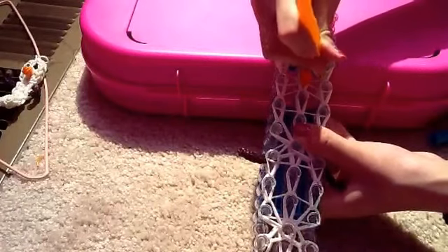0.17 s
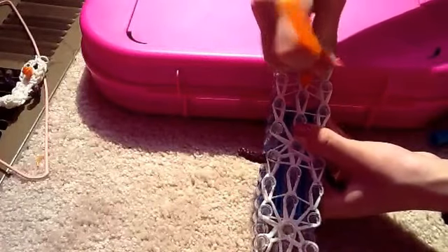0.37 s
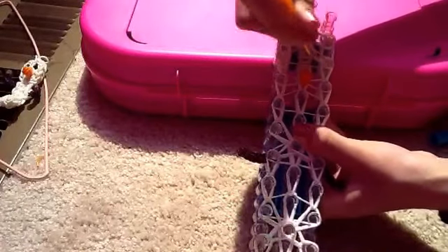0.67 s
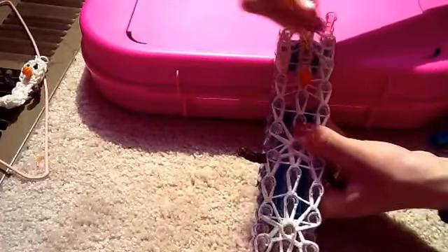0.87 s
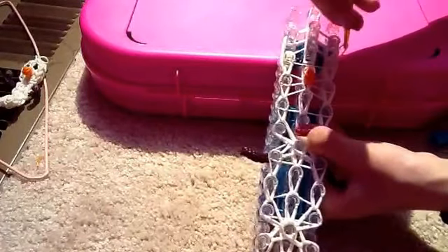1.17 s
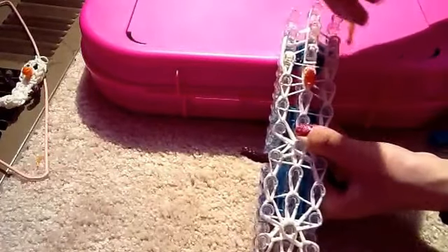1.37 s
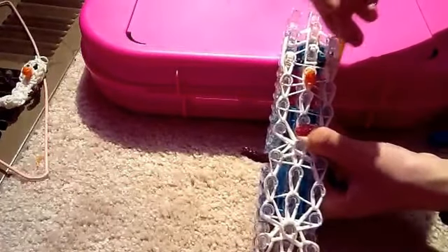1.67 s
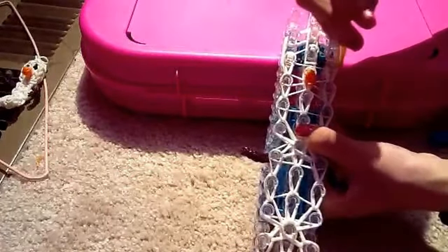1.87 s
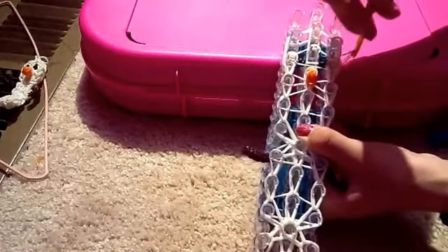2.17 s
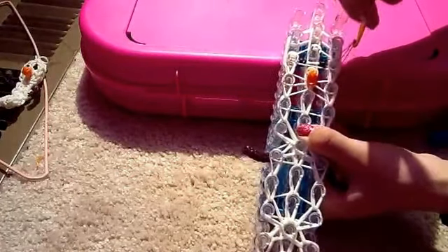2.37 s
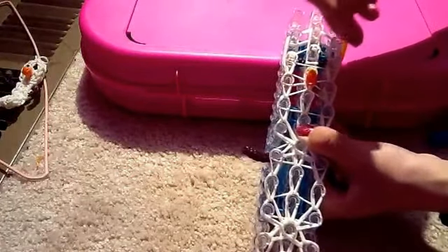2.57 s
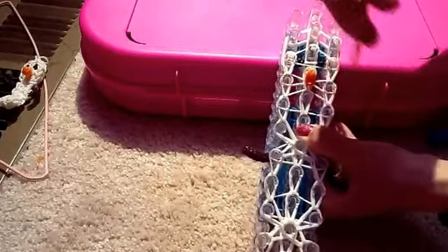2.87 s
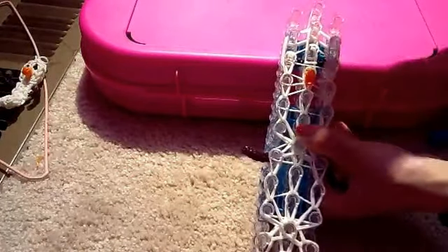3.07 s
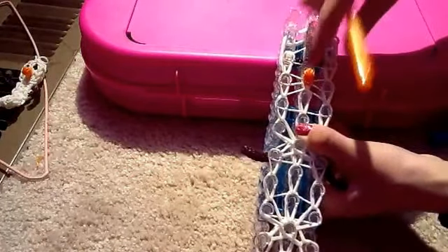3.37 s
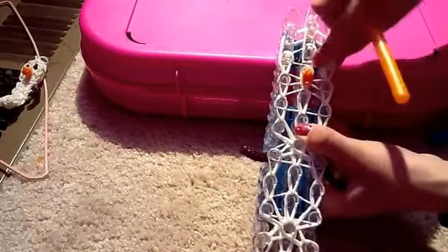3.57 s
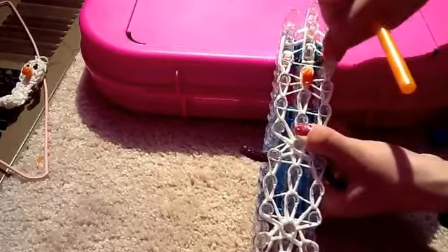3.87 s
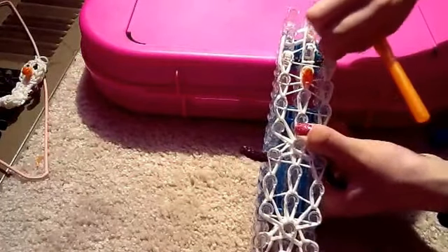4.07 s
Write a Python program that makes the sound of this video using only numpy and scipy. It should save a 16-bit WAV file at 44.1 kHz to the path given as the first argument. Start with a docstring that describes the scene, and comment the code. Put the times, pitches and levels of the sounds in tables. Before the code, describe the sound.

Quiet indoor handling of a plastic band loom: muffled nudges and ticking creaks, one crisp hook tap with tiny creaks after it, a light snap near the middle, then two very close, sharp snaps that dominate everything. Later only a small tick, a dull snap with a brief band note, a tight pair of light clicks and a soft bump. Low hum, rustle and thin hiss persist; close microphone, small soft room, centred sound.

```python
"""A wavering hum, low rustle and hiss come first, with a faint band note; soft bumps, taps and creaks join in.
Rubber bands are worked with a hook on a plastic loom leaning on a hollow plastic case in a small carpeted room.
The hook taps pegs, the strained loom creaks in ticks, and bands snap off the pegs and thump the case.
Contacts are damped modes plus noise bursts with a short room tail; bands are decaying sines; the bed is
coloured noise and steady tones."""
import sys
import numpy as np
from scipy import signal
from scipy.fft import rfft, irfft, next_fast_len
from scipy.io import wavfile
from scipy.ndimage import map_coordinates

SR = 44100
rng = np.random.default_rng(int(sys.argv[2]) if len(sys.argv) > 2 else 0)


def file_out(sig):
    """Save sig as 16-bit WAV at sys.argv[1]."""
    # one column per channel
    cols = np.atleast_2d(sig).T
    # limit, then scale
    lim = np.clip(cols, -1, 1)
    pcm = np.round(lim * 32767).astype(np.int16)
    wavfile.write(sys.argv[1], SR, pcm)


N = 186543
TIME = np.arange(N) / SR  # whole scene [s]
HIT = np.arange(SR // 3) / SR  # one contact [s]

# Levels of snaps, creaks, taps and bumps are relative; each source adds its gain_db.
# bands snapping off pegs: (time [s], level [dB], treble [dB], case thump [dB], peg ring [dB],
# frame knock [dB], bite [Hz])
SNAP_EVENTS = [(1.8931, -32.5, 4.5, -13.5, -4.5, -4.5, 6100), (2.718, -21.5, 6, -7, -4, -15, 4960),
               (2.7572, -18.5, 2, -6.5, 3.5, -27, 4800), (3.8481, -41.5, -10.5, -6, -10, -7.5, 3000),
               (3.9751, -36.5, -1, -6, -1, -6.5, 3070), (3.9850, -36, -2, -14, -21, -8, 3250)]
# loom giving way under the pull: (time [s], level [dB], treble [dB], slips [count])
CREAK_EVENTS = [(.382, -51, -14, 1), (.439, -44.5, -1, 4), (0.958, -44, 8, 1), (.971, -45.5, 17, 1),
                (1.043, -46, 4, 1), (1.316, -44.5, -3, 1), (3.0394, -41.5, 8, 1)]
# hook touching a peg: (time [s], level [dB], treble [dB], case thump [dB], bite [Hz])
TAP_EVENTS = [(0.3502, -56, -12, -17, 2670), (0.431, -55.5, 20.5, -23, 8400), (0.8801, -34, 6, -39, 3860),
              (1.711, -45.5, 5.5, -8, 5600)]
# loom nudging the case: (time [s], level [dB])
BUMP_EVENTS = [(.073, -56.5), (.166, -50.5), (.576, -50.5), (4.071, -47.5)]
# stretched bands left ringing: (time [s], pitch [Hz], level [dB], t60 [s])
TWANG_EVENTS = [(0, 528, -62.5, 0.22), (.8805, 1300, -50.5, 0.081), (3.8515, 552, -46, 0.11)]

# peg resonances: (frequency [Hz], mean relative level [dB])
PEG_MODES = [(1150, -9), (1610, -7.5), (2620, -6), (3390, 9), (4110, 0), (4650, 3.5), (5050, -1), (5600, 6),
             (8200, 4.5), (8730, 6.5), (9900, 4), (12400, 8.5), (13300, -10), (14200, 6)]
# loom frame resonances: (frequency [Hz], mean relative level [dB])
FRAME_MODES = [(290, -1.5), (490, -1.5), (900, 6.5), (1180, 0.5), (2050, -0.5), (3300, -14)]
# loom base resonances: (frequency [Hz], mean relative level [dB])
BASE_MODES = [(620, -14), (1110, -10), (1550, -17), (1780, -7), (2130, -8), (2500, -34), (3020, -1),
              (3280, -3.5), (3910, -7.5), (4890, -4.5), (5670, -17)]
# hook resonances: (frequency [Hz], mean relative level [dB])
HOOK_MODES = [(1220, -6.5), (1420, -9.5), (2620, 2), (3300, 4), (4100, -4.5), (4700, -0.5), (6600, -11),
              (8680, -8), (12400, -4), (13200, -4)]
# low modes of the hollow case: (frequency [Hz], mean relative level [dB])
CASE_MODES = [(128, -5.5), (158, -1), (203, 0), (245, 1.5), (297, -3), (380, -10), (510, -3.5), (660, -22)]
# dense upper modes of the case, as noise: (frequency [Hz], relative level [dB])
THUD_SPECTRUM = [(90, -34), (150, -7), (320, 8.5), (480, -7.5), (1200, -2.5), (1700, -26), (5000, -42)]
# sharp contact noise: (frequency [Hz], relative level [dB])
CRACK_SPECTRUM = [(150, -2), (700, -2.5), (1900, 0), (3200, -0.5), (5000, 1), (7000, 2), (10500, -4),
                  (13000, -6), (15500, -4.5)]
# rubbing noise: (frequency [Hz], relative level [dB])
SCUFF_SPECTRUM = [(150, -38), (600, -25.5), (1500, -10.5), (3200, -16), (5500, -17), (6600, -25),
                  (15000, -45)]
# hiss: (frequency [Hz], relative level [dB])
HISS_SPECTRUM = [(180, -3.5), (300, -4.5), (326, -7.5), (360, -11.5), (390, -6.5), (525, -6), (609, -8),
                 (1050, -11), (2160, -11), (3370, -11.5), (10100, -11.5), (14100, -12.5), (15300, -16)]
# low rustle of hands and room: (frequency [Hz], relative level [dB])
RUSTLE_SPECTRUM = [(25, -17), (50, -10), (85, -5.5), (115, 0.5), (170, 3), (240, -3), (330, -9.5),
                   (500, -15.5), (1200, -18.5), (4000, -69)]
# rustle level before its gain and wander: (time [s], level [dB])
RUSTLE_LEVEL = [(0.0, -67.5), (0.47, -67), (2.0, -71.5), (3.56, -69), (3.88, -69), (4.23, -64)]
# room decay: (frequency [Hz], t60 [s])
ROOM_DECAY = [(150, 0.17), (500, 0.21), (2000, 0.13), (5000, 0.12), (9000, 0.13), (15000, 0.089)]

# run of slips: first gap, each gap over the last, loss per slip, case's share
SLIP_GAP_S, SLIP_SLOWING, SLIP_LOSS_DB, CREAK_THUMP_DB = 0.0204, 1.083, 0.5, -11
RUSTLE_WANDER_DB, RUSTLE_KNOTS_PER_S = 1.5, 7
HUM_BASE_DB, HUM_FADE_DB_PER_S = -68, 1.8
SWELL_DB, SWELL_PERIOD_S, SWELL_PEAK_S = 4, 1.17, 0.53  # hum wavering
TOP_HZ = 15450


def amp(db):
    """Decibels to gain."""
    return 10 ** (np.asarray(db) / 20)


def along(points, hz):
    """Interpolate (frequency [Hz], value) rows on a log-frequency axis."""
    f, v = np.transpose(points)
    return np.interp(np.log(hz + 1), np.log(f), v)


def curve(rows):
    """Interpolate (time [s], value) rows to every sample."""
    return np.interp(TIME, *np.transpose(rows))


def filtered(x, response):
    """Multiply the spectrum of x by a response of frequency."""
    n = x.shape[-1]
    m = next_fast_len(n + 8192)
    spectrum = rfft(x, m) * response(np.fft.rfftfreq(m, 1 / SR))
    return irfft(spectrum, m)[..., :n]


def noise(spectrum, size):
    """Coloured noise scaled to unit standard deviation."""
    x = filtered(rng.standard_normal(size), lambda hz: amp(along(spectrum, hz)))
    return x / x.std()


def tone(hz):
    """Sine of rms 1 at a random phase."""
    return np.sqrt(2) * np.sin(2 * np.pi * (hz * TIME + rng.random()))


def wobble(knots_per_s):
    """Smooth curve through random knots."""
    return map_coordinates(rng.standard_normal(256), [TIME * knots_per_s], mode="mirror")


def unit_energy(x):
    """Scale x to energy 1."""
    return x / np.linalg.norm(x)


def add(track, start_s, sound):
    """Mix a sound into the track, cut at the track's end."""
    part = track[max(round(start_s * SR), 0):][:len(sound)]
    part += sound[:len(part)]


def ring(modes, t60_1khz_s, attack_s):
    """Damped modes, levels varied at each blow; higher modes of plastic die sooner."""
    hz, db = np.transpose(modes)[:, :, None]
    t60_s = t60_1khz_s * np.sqrt(1000 / hz)
    level_db = db + rng.standard_normal(hz.shape) - 60 * HIT / t60_s
    waves = amp(level_db) * np.sin(2 * np.pi * hz * HIT)
    swing = waves[::2].sum(0) - waves[1::2].sum(0)  # neighbouring modes swing in opposite senses
    return unit_energy(swing * (1 - np.exp(-HIT / attack_s)))


def burst(spectrum, t60_s):
    """Contact noise: instant onset, exponential decay."""
    return unit_energy(noise(spectrum, len(HIT)) * amp(-60 * HIT / t60_s))


def bite(click, hz, boost_db, octaves):
    """Where the peg is caught decides which range of the click stands out."""
    def peak(f):
        offset = np.log2((f + 1) / hz) / octaves
        return amp(boost_db * np.exp(-offset ** 2 / 2))
    return filtered(click, peak)


def in_room(x, wet_db, gap_s=0.0028, build_s=0.01):
    """Add the room's short noise-like answer, which builds once the first walls are reached."""
    hz, t, z = signal.stft(rng.standard_normal(len(HIT)), SR, nperseg=256)
    decay = amp(-60 * t / along(ROOM_DECAY, hz)[:, None])
    tail = signal.istft(z * decay, SR, nperseg=256)[1][:len(HIT)]
    tail *= np.clip((HIT - gap_s) / build_s, 0, 1)
    return x + amp(wet_db) * signal.fftconvolve(x, unit_energy(tail))[:len(x)]


def contact(click, treble_db, thump_db, wet_db, edge_hz=6500, thud_db=-2):
    """Each contact has its own brightness; its push makes the case thump with low modes and a dense thud."""
    bright = filtered(click, lambda hz: amp(treble_db * hz ** 4 / (hz ** 4 + edge_hz ** 4)))
    case = ring(CASE_MODES, t60_1khz_s=0.039, attack_s=0.0012)
    thud = amp(thud_db) * burst(THUD_SPECTRUM, t60_s=0.072)
    return in_room(bright + amp(thump_db) * unit_energy(case + thud), wet_db)


def low_swell(peak_s=2.365, width_s=0.053, pitch_hz=112, level_db=-61, octave_db=-9):
    """A soft low note and its octave swell and fade once in a Gaussian envelope."""
    envelope = np.exp(-((TIME - peak_s) / width_s) ** 2 / 2)
    return amp(level_db) * envelope * (tone(pitch_hz) + amp(octave_db) * tone(2 * pitch_hz))


def background(hiss_db=-63.5, rustle_gain_db=1.0, hum_hz=124.5, mains_hz=60, mains_db=-74.0):
    """Even hiss, wandering low rustle, a hum that wavers as it fades, a mains tone and one low swell."""
    hiss = amp(hiss_db) * noise(HISS_SPECTRUM, N)
    wander_db = RUSTLE_WANDER_DB * wobble(RUSTLE_KNOTS_PER_S)
    rustle_db = curve(RUSTLE_LEVEL) + rustle_gain_db + wander_db
    rustle = amp(rustle_db) * noise(RUSTLE_SPECTRUM, N)
    swell_db = SWELL_DB * np.cos(2 * np.pi * (TIME - SWELL_PEAK_S) / SWELL_PERIOD_S)
    hum = amp(HUM_BASE_DB - HUM_FADE_DB_PER_S * TIME + swell_db) * tone(hum_hz)
    mains = amp(mains_db) * tone(mains_hz)
    return hiss + rustle + hum + mains + low_swell()


def twangs():
    """A taut band sounds one quickly damped note."""
    track = np.zeros(N)
    for start_s, hz, db, t60_s in TWANG_EVENTS:
        note = amp(db - 60 * HIT / t60_s) * np.sin(2 * np.pi * hz * HIT)
        add(track, start_s, note * (1 - np.exp(-HIT / 0.0024)))
    return track


def bumps(gain_db=16, scuff_db=-6, knock_db=-6):
    """The loom shifts against the case: soft thump, a little scuff, a knock of the frame."""
    track = np.zeros(N)
    for start_s, db in BUMP_EVENTS:
        scuff = amp(scuff_db) * burst(SCUFF_SPECTRUM, t60_s=0.058)
        knock = amp(knock_db) * ring(FRAME_MODES, t60_1khz_s=0.025, attack_s=0.00071)
        sound = contact(scuff + knock, treble_db=-8, thump_db=0.0, wet_db=-7.0)
        add(track, start_s, amp(db + gain_db) * sound)
    return track


def taps(gain_db=16):
    """The hook clicks lightly against a peg: hook modes plus contact noise."""
    track = np.zeros(N)
    for start_s, db, treble_db, thump_db, bite_hz in TAP_EVENTS:
        hook = ring(HOOK_MODES, t60_1khz_s=0.024, attack_s=0.0002)
        click = unit_energy(hook + amp(-5) * burst(CRACK_SPECTRUM, t60_s=0.024))
        sound = bite(click, bite_hz, boost_db=6, octaves=0.21)
        add(track, start_s, amp(db + gain_db) * contact(sound, treble_db, thump_db, wet_db=-9.5))
    return track


def creaks(gain_db=16):
    """The strained loom slips in ticks, singly or in a slowing run; each rings the base and rasps."""
    track = np.zeros(N)
    for start_s, db, treble_db, slips in CREAK_EVENTS:
        for k in range(round(slips)):
            base = ring(BASE_MODES, t60_1khz_s=0.035, attack_s=0.001)
            slip = unit_energy(base + amp(-4) * burst(SCUFF_SPECTRUM, t60_s=0.037))
            rasp = amp(-4.5) * burst(SCUFF_SPECTRUM, t60_s=0.14)
            sound = contact(slip + rasp, treble_db, CREAK_THUMP_DB, wet_db=-8.0)
            add(track, start_s, amp(db + gain_db - SLIP_LOSS_DB * k) * sound)
            start_s = start_s + SLIP_GAP_S * SLIP_SLOWING ** k
    return track


def snaps(gain_db=16):
    """A band lets go: a sharp crack, with the peg's ring, a frame knock and a shiver of loose parts at once."""
    track = np.zeros(N)
    for start_s, db, treble_db, thump_db, peg_db, knock_db, bite_hz in SNAP_EVENTS:
        snap = amp(-6.5) * burst(CRACK_SPECTRUM, t60_s=0.0011)
        crackle = amp(-4) * burst(CRACK_SPECTRUM, t60_s=0.029)
        peg = amp(peg_db) * ring(PEG_MODES, t60_1khz_s=0.027, attack_s=0.0002)
        click = bite(unit_energy(snap + crackle + peg), bite_hz, boost_db=6.5, octaves=0.15)
        knock = amp(knock_db) * ring(FRAME_MODES, t60_1khz_s=0.022, attack_s=0.00009)
        shiver = amp(-8) * burst(CRACK_SPECTRUM, t60_s=0.17)
        sound = contact(click + knock + shiver, treble_db, thump_db, wet_db=-12)
        add(track, start_s, amp(db + gain_db) * sound)
    return track


def scene():
    """Sum all sources to mono; both channels carry the same signal."""
    mono = background() + twangs() + bumps() + taps() + creaks() + snaps()
    return np.array([mono, mono])


def record(dry, low_cut_hz=105):
    """Roll off the deep bass and cut steeply above TOP_HZ."""
    high_pass = signal.butter(3, low_cut_hz, "highpass", fs=SR, output="sos")
    thin = signal.sosfilt(high_pass, dry)
    return filtered(thin, lambda hz: 1 / np.sqrt(1 + (hz / TOP_HZ) ** 300))


dry = scene()
out = record(dry)
file_out(out)
```